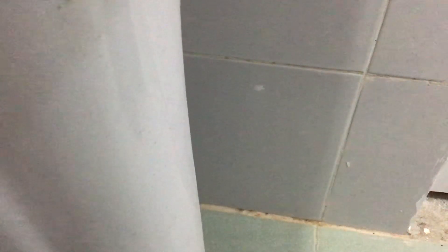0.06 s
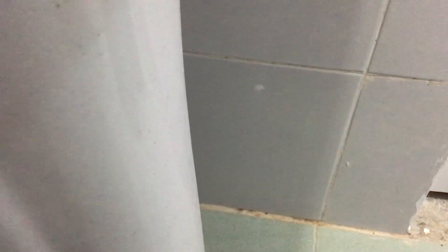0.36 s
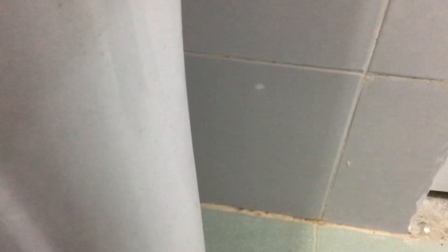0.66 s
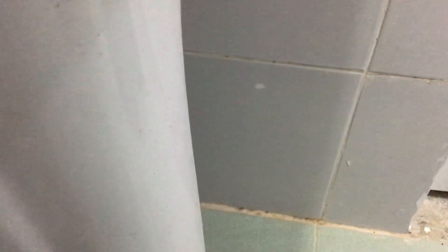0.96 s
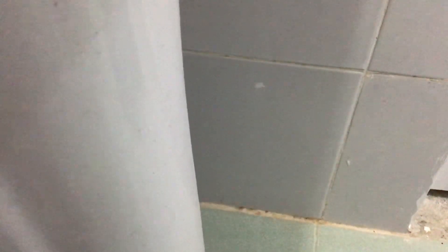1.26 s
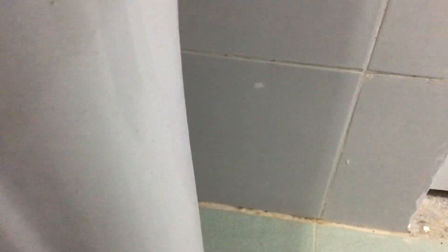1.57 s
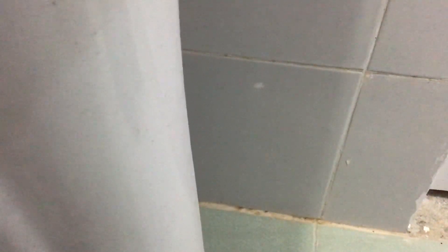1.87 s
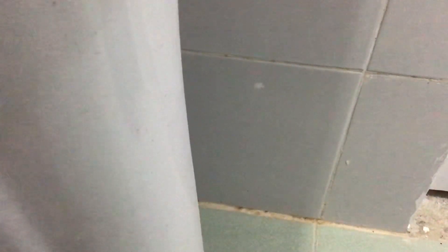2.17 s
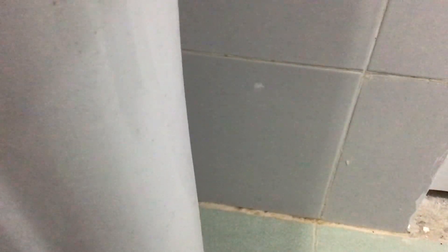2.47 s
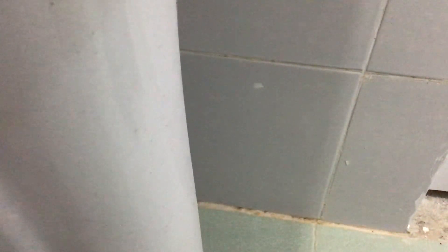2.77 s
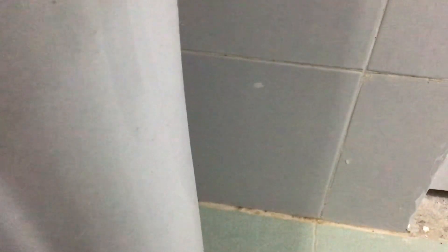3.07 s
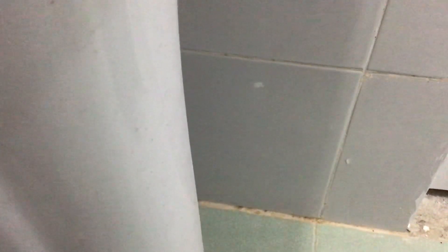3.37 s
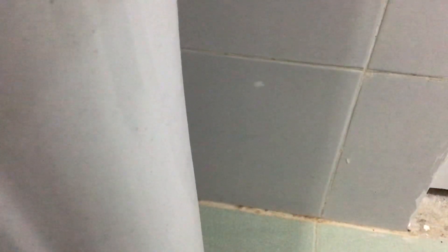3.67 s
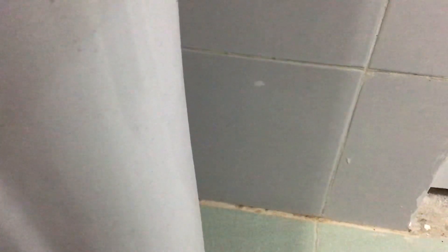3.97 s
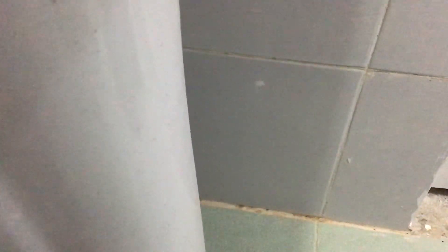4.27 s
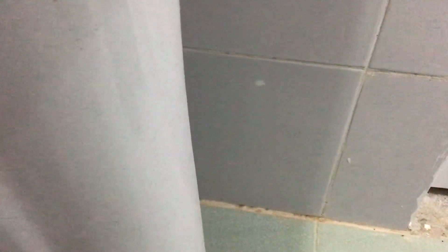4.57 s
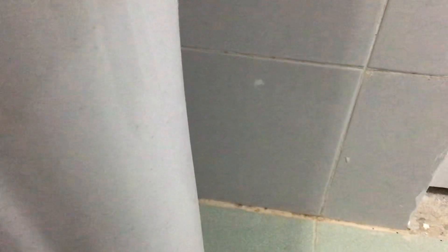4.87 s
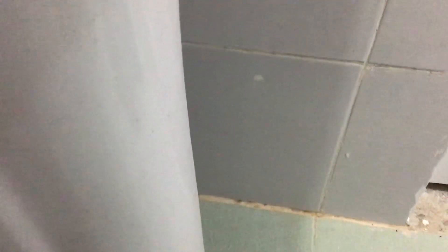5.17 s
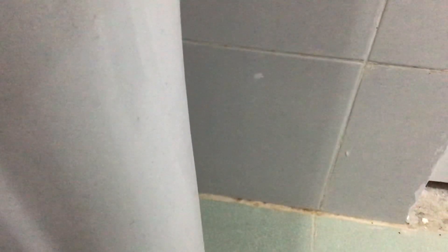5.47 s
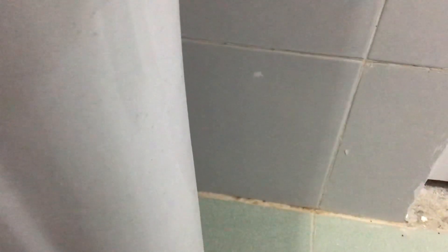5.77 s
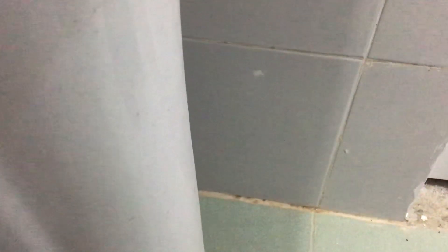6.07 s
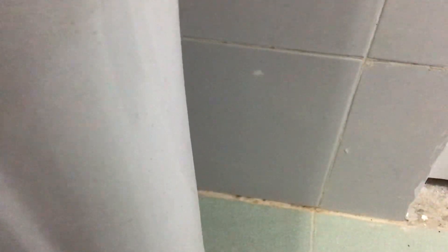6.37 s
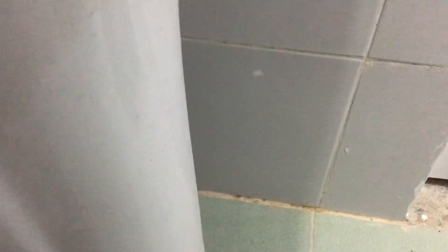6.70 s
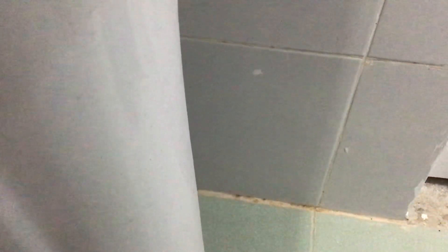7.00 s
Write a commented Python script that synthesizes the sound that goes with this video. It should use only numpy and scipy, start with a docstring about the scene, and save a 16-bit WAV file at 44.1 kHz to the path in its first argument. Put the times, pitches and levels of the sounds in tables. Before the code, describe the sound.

Steady indoor ventilation: a deep, fluttering duct drone and hollow rush of air beneath a faint hiss from the grille.

```python
"""A small tiled room, where an air vent runs steadily.
Swirling air makes the duct ring at its favourite pitches, called resonances. The strongest lie
close together and beat against each other in an uneven throb; the weaker ones drone and rush.
The grille adds an airy hiss, coloured by the hard walls, and the fan a faint steady tone."""
import sys
import numpy as np
from scipy import signal
from scipy.fft import rfft, irfft
from scipy.io import wavfile
from scipy.ndimage import uniform_filter1d

SR = 44100
rng = np.random.default_rng(int(sys.argv[2]) if len(sys.argv) > 2 else 0)


def unload_wav(signal):
    """Save mono or channel-first audio to the path in sys.argv[1] as 16-bit WAV at rate SR, clipped to [-1, 1]."""
    wavfile.write(
        sys.argv[1],
        SR,
        np.round(np.clip(np.atleast_2d(signal).T, -1, 1) * 32767).astype(np.int16),
    )


N = 310464


def undb(db):
    """Turn decibels into a number to multiply by."""
    return 10 ** (np.asarray(db) / 20)


def level(x, db):
    """Scale a sound to the given average (rms) level."""
    return x * undb(db) / np.sqrt(np.mean(x ** 2))


def smooth(x, seconds):
    """Even out quick changes with a running average, taken twice."""
    size = max(int(seconds * SR), 1)
    return uniform_filter1d(uniform_filter1d(x, size), size)


def swell(x, curve, seconds=0.22):
    """Make a sound follow a slow level curve while its quick throbbing stays."""
    steady = x / np.sqrt(smooth(x ** 2, seconds))
    curve_db = np.interp(np.arange(N) / SR, *np.transpose(curve))
    return steady * undb(curve_db)


def turbulence(gain):
    """Swirling air makes noise; gain(f) says how strong each frequency is."""
    hz = np.maximum(np.arange(N // 2 + 1) * SR / N, 1)
    spectrum = rfft(rng.standard_normal(N))
    return level(irfft(spectrum * gain(hz), N), 0)


def resonate(modes):
    """Swirling air rings resonances: each one is a peak in the noise, and their powers add."""
    def gain(f):
        power = 0
        for hz, width, db in modes:
            off_pitch = (f / hz - hz / f) * hz / width
            power += (undb(db) / (1 + off_pitch ** 2)) ** 2
        return np.sqrt(power)
    return turbulence(gain)


def room(x, fade_s=0.75, echo_db=-9):
    """The tiles add a blur of echoes that fades by 60 dB in fade_s; the overall level is kept."""
    t = np.arange(SR) / SR
    tail = rng.standard_normal(SR) * np.exp(-np.log(1000) * t / fade_s)
    tail *= undb(echo_db) / np.sqrt(np.sum(tail ** 2))
    # the air has long been running, so echoes fill the room from the start
    echoes = irfft(rfft(x) * rfft(tail, N), N)
    return (x + echoes) / np.sqrt(1 + undb(echo_db) ** 2)


def fan():
    """The turning fan hums one faint, steady tone."""
    # the fan's tone: f/Hz, level/dB
    tones = [(115, -49)]
    t = np.arange(N) / SR
    return sum(undb(db) * np.sqrt(2) * np.sin(2 * np.pi * hz * t) for hz, db in tones)


def grille():
    """Air hisses through the slots and rings them faintly; a thin, high sizzle swells a little."""
    # tone colour of the hiss: f/Hz, relative level/dB
    hiss_shape = [(25, -6), (200, 0), (900, 1), (1250, -2), (2600, -2.5), (3200, -4), (4300, -3),
                  (4900, -15), (5900, -25), (7100, -26.5), (7900, -32), (8250, -29), (10500, -35.5),
                  (15500, -42.5)]
    # resonances of the slots: f/Hz, width/Hz, relative level/dB
    slot_modes = [(2590, 260, -3.5), (3910, 630, 1.5), (4170, 320, -6), (5380, 160, -11.5)]
    # peaks of the sizzle: f/Hz, width/Hz, relative level/dB
    sizzle_modes = [(8330, 600, 0.5), (9500, 700, -7.5), (11600, 460, -9.5)]
    # slow swell of the sizzle: t/s, level/dB
    sizzle_curve = [(0, -88), (2.3, -88), (3.0, -86), (3.4, -86), (3.7, -84.5), (3.95, -87), (4.35, -86),
                    (4.65, -89), (4.95, -84), (5.3, -88), (7.04, -89)]
    hz, db = np.transpose(hiss_shape)
    hiss = turbulence(lambda f: undb(np.interp(np.log(f), np.log(hz), db)))
    slots = resonate(slot_modes)
    sizzle = swell(resonate(sizzle_modes), sizzle_curve)
    air = room(level(hiss, db=-52) + level(slots, db=-61.5) + sizzle)
    flicker = level(smooth(rng.standard_normal(N), seconds=0.044), db=0)
    return air * undb(0.42 * flicker)  # the level flickers by about 0.4 dB


def rush():
    """Air flowing along the duct stirs many weak resonances into a hollow rush."""
    # weaker resonances of duct and room: f/Hz, width/Hz, relative level/dB
    modes = [(55, 8.7, -13), (72.2, 21.3, -3.5), (133.8, 8.8, -3), (145.3, 5.9, 2), (180.4, 6.6, -7.5),
             (195.5, 6.7, -10.5), (212, 19.5, -13), (230, 11, -15), (253.1, 6.4, -10), (273, 17.4, -11),
             (287.3, 7, -12), (301.9, 8, -10), (320.3, 12.7, -16.5), (366.3, 24, -19), (383, 14, -16.5),
             (404.7, 14, -15.5), (424, 17, -15), (457.8, 17.6, -13.5), (487, 32, -15.5), (539.4, 31, -16),
             (568.4, 20, -15), (599, 23.4, -15.5), (636, 21, -17.5), (679, 28, -22.5), (730.3, 54, -19),
             (768, 46, -23), (987, 21, -27.5), (1080, 20, -29.5), (1124, 18, -32), (2194, 31, -36.5)]
    return level(resonate(modes), db=-42)


def drone():
    """A pair of duct resonances drones above the boom and swells on its own."""
    # two close resonances: f/Hz, width/Hz, relative level/dB
    modes = [(160.5, 4.9, -1.5), (170.7, 7.4, -0.5)]
    # slow swell of the drone: t/s, level/dB
    curve = [(0.0, -49.5), (1.1, -48.5), (1.4, -44.5), (2.65, -44.5), (3.25, -51), (3.65, -45.5),
             (4.5, -48.5), (6.2, -45), (7.04, -47.5)]
    return swell(resonate(modes), curve)


def boom(band_hz=(66, 130), surge_s=0.021):
    """Close, low resonances boost and cancel each other in turn: a throb that swells and surges."""
    # strongest resonances of duct and room: f/Hz, width/Hz, relative level/dB
    modes = [(88.33, 5.8, 2), (96.5, 5.9, -2), (107, 7.2, -4)]
    # slow swell of the boom: t/s, level/dB
    curve = [(0.0, -35), (0.38, -38), (0.6, -36.5), (0.9, -35.5), (1.34, -37.5), (1.48, -36.5), (2.11, -40),
             (2.43, -37.5), (2.88, -37), (3.39, -34), (3.52, -45), (3.68, -39), (3.87, -38.5), (4.15, -36),
             (4.4, -36), (4.68, -34.5), (5.25, -36), (5.57, -36.5), (6.33, -37.5), (6.55, -34),
             (7.04, -34.5)]
    # the strongest single throbs: t/s, level/dB
    surges = [(0.146, -29), (0.311, -29.5), (0.375, -27.5), (1.011, -28.5), (1.126, -29), (1.276, -29.5),
              (1.36, -28.5), (1.73, -30.5), (1.972, -29), (2.055, -28), (2.191, -28), (2.6, -33),
              (2.824, -29), (2.926, -29), (3.01, -27.5), (3.254, -30), (3.39, -27.5), (3.61, -32),
              (3.67, -29.5), (3.73, -30), (4.507, -25), (4.667, -26), (4.783, -27.5), (4.882, -28),
              (4.997, -30), (5.11, -28), (5.369, -26.5), (5.972, -29.5), (6.85, -31)]
    t = np.arange(N) / SR
    ring = resonate(modes)
    hum = swell(ring, curve)
    even_ring = ring / np.sqrt(smooth(ring ** 2, surge_s))
    for at, db in surges:
        blend = np.exp(-((t - at) / surge_s) ** 2)  # glide to the surge's level and back
        hum = (1 - blend) * hum + blend * even_ring * undb(db)
    # the throb stays inside the duct's low band
    low_band = signal.butter(2, band_hz, "bandpass", fs=SR, output="sos")
    return signal.sosfiltfilt(low_band, hum)


def scene():
    """The vent, heard from one spot in the room."""
    return (boom() + drone() + rush() + grille() + fan())[None]


def record(dry, bass_hz=36, top_hz=15700):
    """The microphone thins the deepest bass and cuts the highest treble."""
    bass_cut = signal.butter(2, bass_hz, "highpass", fs=SR, output="sos")
    treble_cut = signal.ellip(8, .2, 70, top_hz, fs=SR, output="sos")
    return signal.sosfilt(treble_cut, signal.sosfilt(bass_cut, dry))


dry = scene()
out = record(dry)
unload_wav(out)
```